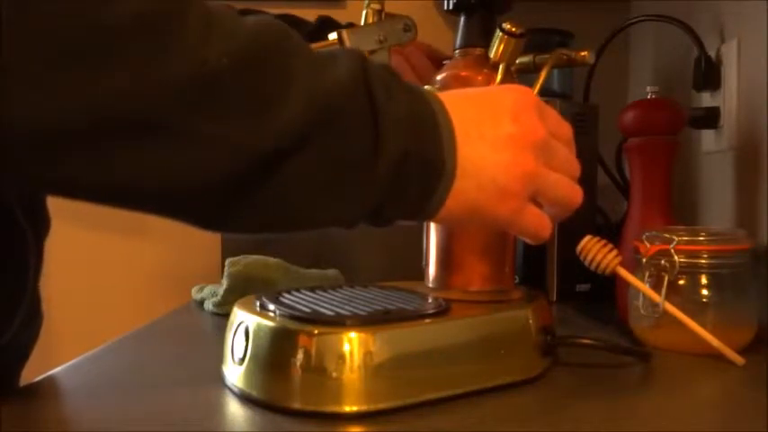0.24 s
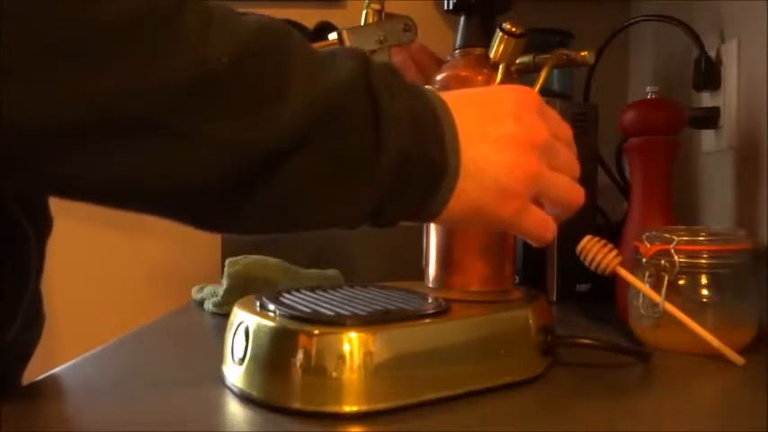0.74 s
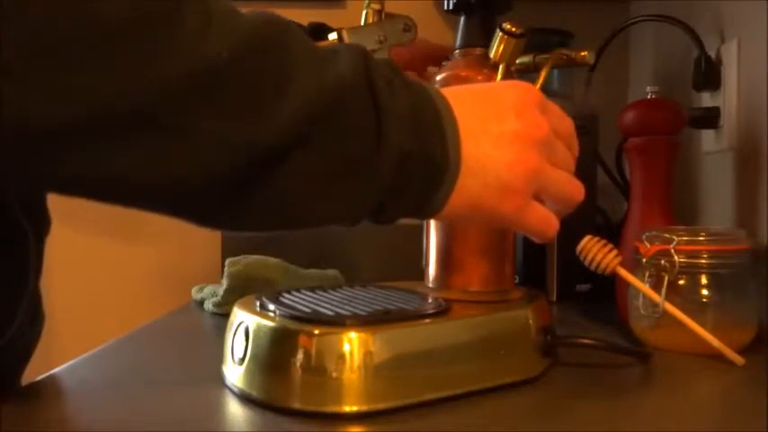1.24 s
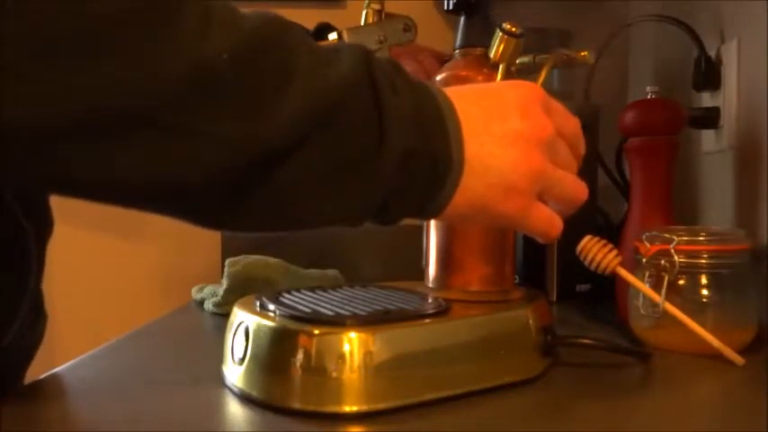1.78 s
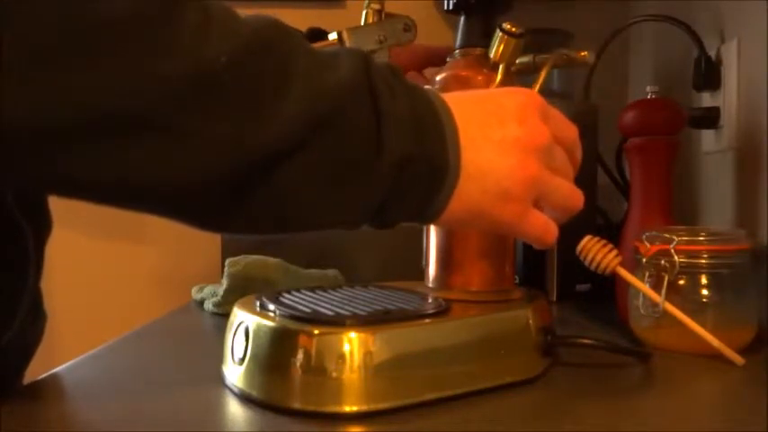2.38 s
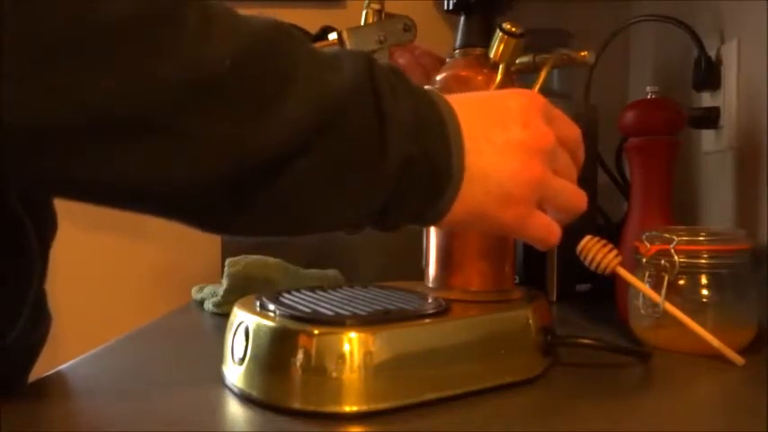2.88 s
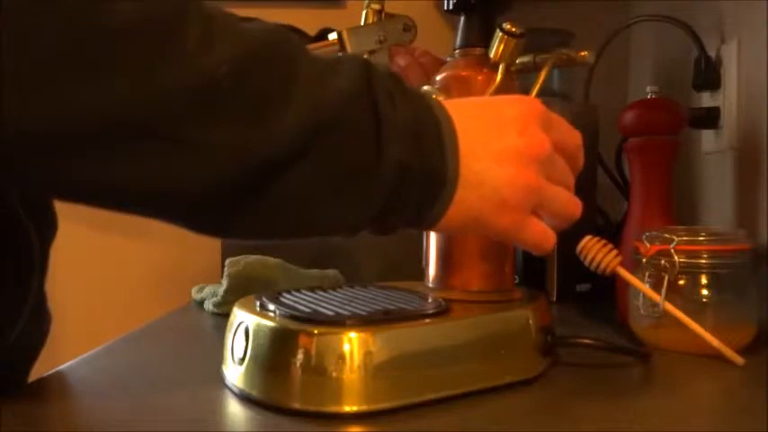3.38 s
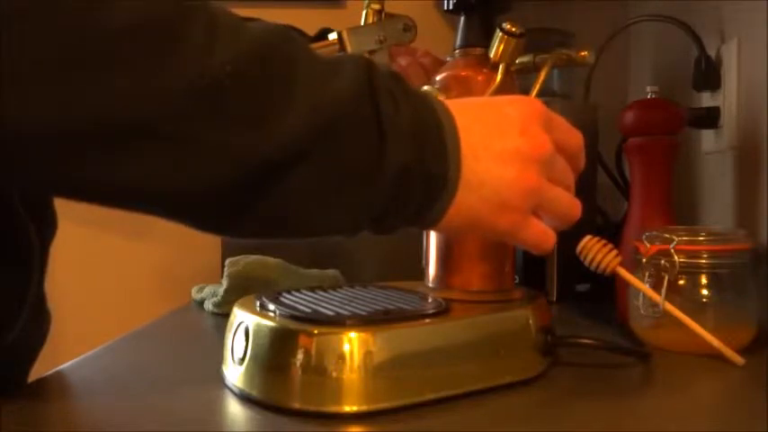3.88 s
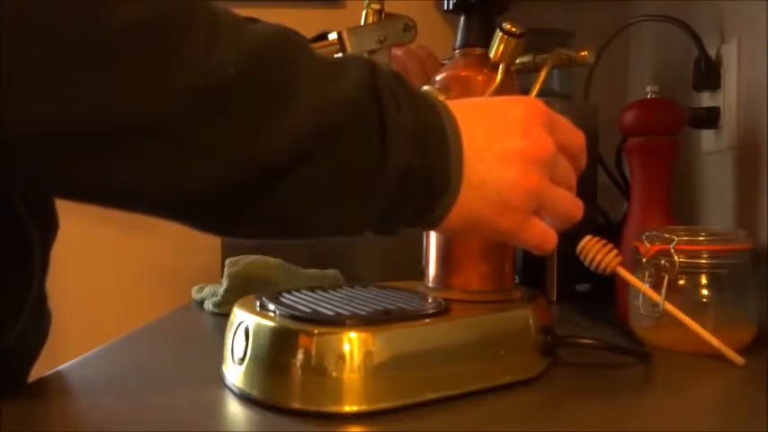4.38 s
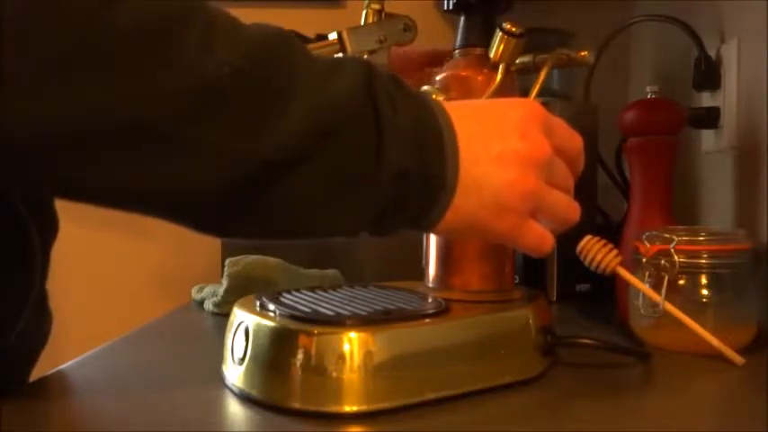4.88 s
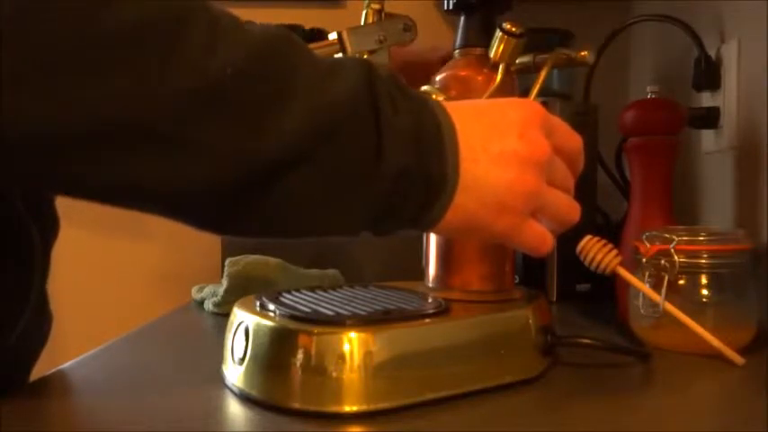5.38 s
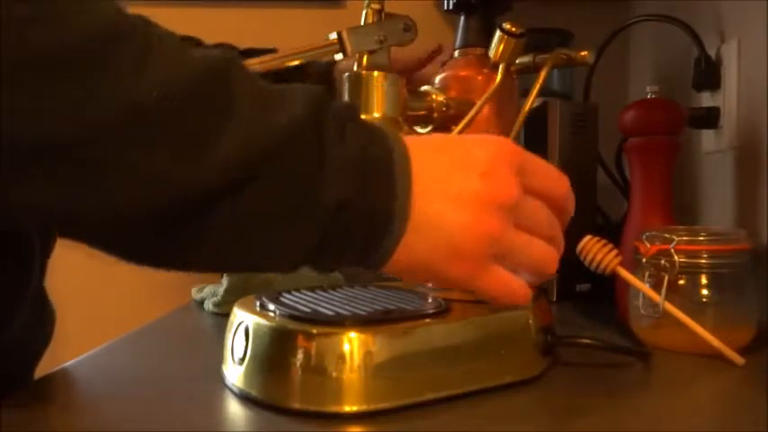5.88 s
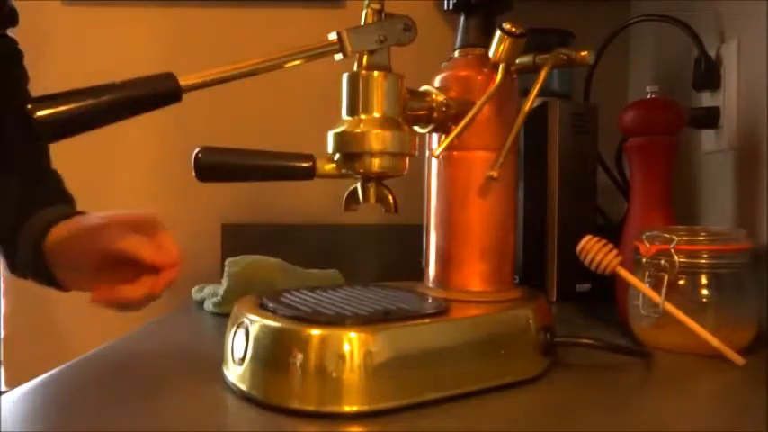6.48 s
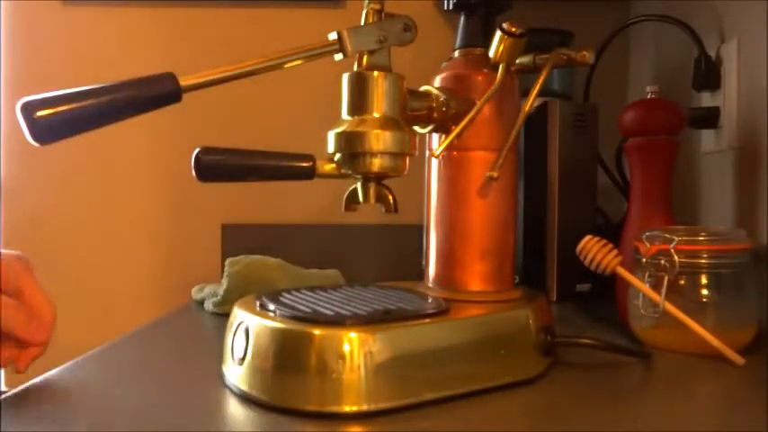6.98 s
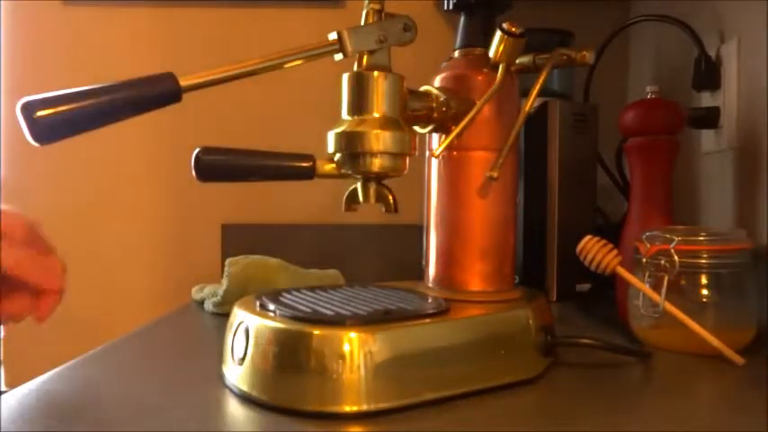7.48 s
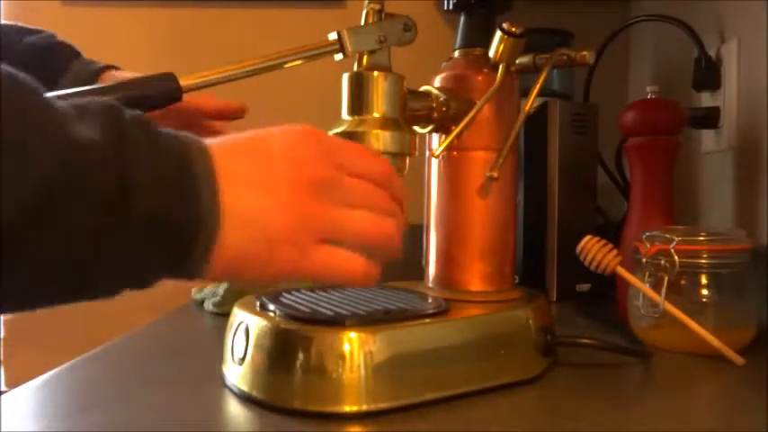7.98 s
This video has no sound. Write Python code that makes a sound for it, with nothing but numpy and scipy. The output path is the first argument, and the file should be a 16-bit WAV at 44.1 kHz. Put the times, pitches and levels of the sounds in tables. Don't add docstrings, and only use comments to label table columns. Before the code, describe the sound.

Steam blasts and sputters wetly from an espresso machine wand, dries to a steady loud hiss, shuts off abruptly, then faint hissing and soft handle knocks.

```python
import sys
import numpy as np
from scipy import signal
from scipy.fft import rfft, irfft, next_fast_len
from scipy.io import wavfile
from scipy.ndimage import uniform_filter1d, map_coordinates

SR = 44100
rng = np.random.default_rng(int(sys.argv[2]) if len(sys.argv) > 2 else 0)


def generate_wav(sig):
    pcm = np.round(np.clip(np.atleast_2d(sig).T, -1, 1) * 32767).astype(np.int16)
    wavfile.write(sys.argv[1], SR, pcm)


def gain_from_db(level_db):
    decades = np.asarray(level_db, float) / 20
    return 10 ** decades


N = 363825

# f/Hz, width/Hz, level/dB early, level/dB settled, level/dB with the
BOILER_MODES = [(2200, 236, -6, -7.5, -7.5), (2370, 89, -3.5, -4.5, -7), (2574, 150, -6.2, -6.5, -2.5),
                (2807, 213, -3.5, -2, -1), (3034, 320, -9, -9, -8.5), (3338, 153, -2.5, -2, -4.5),
                (3594, 116, -3.5, -3, -5), (3732, 154, -0.8, -0.6, -6), (4050, 200, -4, -7, -9),
                (4290, 50, -14, -14, -6), (4330, 110, -6, -6.5, -9), (4522, 118, -1, -3, 0),
                (4797, 227, -2.5, -4, -1), (5245, 170, -13, -7.5, -11.5), (5380, 75, -14, -16.9, -15),
                (5698, 220, -1.4, -5, -6.5), (5920, 300, -7.5, -16, -14), (6370, 210, -22, -12, -12),
                   (7020, 770, -35.0, -18.5, -17.5), (7230, 210, -11, -13, -14.5),
                   (7684, 608, -35.0, -19.9, -18.5), (8190, 467, -12, -15.4, -15.9),
                   (8536, 164, -2.5, -4.5, -4.5), (8880, 380, -6.5, -8.5, -7), (9280, 120, -13, -8, -10),
                   (9400, 670, -15.5, -10, -11.5), (9830, 270, -3, -17, -10.5),
                   (10100, 210, -36.0, -8, -6.5), (10410, 300, -8.5, -5.5, -4),
                   (10730, 460, -4.5, -11, -10)]
# f/Hz, width/Hz, level/dB
NOZZLE_MODES = [(2198, 92, -5), (2320, 880, -12), (2900, 200, -14.5), (3240, 45, -11.3), (3450, 200, -9.5),
                (3870, 690, -5.5), (4470, 550, -9), (4930, 51, -7), (4930, 91, -7.5), (5010, 840, -11),
                (5650, 330, -7.5), (6110, 500, -3.5), (6380, 201, -2.5), (6430, 104, -5), (6630, 309, -4),
                (6970, 280, -1.5), (7320, 340, -3), (7700, 331, -5.3), (8030, 500, -4), (8300, 143, -6),
                (8640, 240, -0.5), (8940, 220, 0.5), (9400, 290, -1.5), (9700, 93, -3), (9800, 190, 0),
                (10260, 458, -3.5), (10090, 145, 1.5), (10530, 180, -3.8), (10675, 127, 4.5),
                (10916, 260, -1.5)]
# f/Hz, width/Hz, level/dB
PIPE_MODES = [(733, 86, -11.5), (967, 205, -11.5), (1263, 140, -5), (1378, 20, -2), (1466, 370, -0.5),
              (1825, 430, -5.5)]
# f/Hz, width/Hz, depth/dB
CANCELLED_SLOTS = [(1406, 34, -9), (1770, 52, -4), (2007, 73, -9), (2440, 40, -8), (2704, 35, -4),
                   (2894, 46, -6.5), (3160, 40, -4), (3470, 50, -5), (4256, 40, -4), (4630, 45, -5),
                   (5300, 60, -2), (5490, 50, -6), (5100, 50, -5), (10150, 140, -3.5)]
# t/s, level/dB
VALVE_PRESSURE = [(0, -20), (.2, -18), (1.3, -18.6), (1.8, -22.2), (2.4, -24.5), (3.0, -28), (4.0, -28),
                  (4.8, -33), (5.08, -27), (6.2, -26), (8.25, -27)]
# t/s, stage (0 early, 1 settled, 2+ arm away)
BOILER_STAGE = [
    (0, 0),
    (1.4, 0.26),
    (2.8, 0.59),
    (5.9, 1.46),
    (6.4, 3),
    (8.25, 4),
]
# t/s, level/dB, length/s
WATER_SLUGS = [(0.14, -35, 0.025), (0.208, -30, 0.042), (0.282, -26.5, .04), (0.432, -29, .025),
               (0.55, -48, 0.012), (0.602, -40, .02), (0.672, -37, .015), (0.732, -32, .02),
               (0.794, -31, 0.024), (0.852, -29, 0.029), (0.885, -31, .02), (0.975, -33, 0.022),
               (1.06, -34, 0.038), (1.192, -29, 0.026), (1.364, -38, 0.025), (1.583, -21.5, 0.026)]
# t/s, peak level/dB, main ring f/Hz, t60/s
SOFT_KNOCKS = [(1.571, -43, 310, 0.1), (5.169, -51, 746, .08), (5.8, -55, 700, .08), (6.85, -48, 1080, .08),
               (6.98, -44, 844, 0.14), (6.985, -54, 230, .12), (7.55, -45, 860, 0.13),
               (7.578, -55, 895, .15), (7.598, -45, 885, .1), (7.652, -49, 907, .15),
               (7.678, -50, 915, .08), (8.049, -54, 900, .08), (8.239, -41, 1290, .05),
               (8.24, -36, 1850, 0.045), (8.241, -41, 900, .05), (8.243, -50, 250, .05)]
# frequency ratio, level/dB
KNOCK_PARTIALS = [(1, 0), (.87, -5), (1.22, -12), (.74, -11)]
# f/Hz, level/dB per Hz
ROOM_SPECTRUM = [(15, -85), (119, -15), (157, -16), (227, -8.5), (300, -14), (368, -7.5), (420, -13.5),
                 (520, -10), (610, -18), (690, -13.5), (1140, -17), (1650, -8.5), (2000, -12.5),
                 (3200, -120)]
# f/Hz, side minus mid level/dB
SIDE_OVER_MID = [(60, -23), (130, -18), (220, -8), (400, -4), (600, -10.5), (750, -4), (950, -9),
                 (1300, -6), (2010, -8), (3610, -9), (6480, -9.5), (11600, -13)]
# f/Hz, left minus right level/dB
LEFT_OVER_RIGHT = [(60, 0.0), (110, 2), (190, 0.65), (350, 0.093), (620, 0.78), (1120, -2), (2010, -1),
                   (3610, -2), (6480, -2), (11600, -1.4)]
# t/s, low f/Hz, high f/Hz
QUIET_BAND_GAPS = [(.1, 430, 680), (.48, 820, 900), (.6, 750, 900), (.795, 520, 845), (1.158, 200, 560),
                   (3.27, 20, 180), (2.63, 20, 676), (3.77, 20, 300), (4.6, 20, 300), (6.0, 780, 1340),
                   (6.49, 20, 150), (6.81, 1040, 1340)]

JET_DB, WET_JET_DB, PUFF_S, NOZZLE_CLEARS_S, NOZZLE_DRY_S = -22.5, -6, 0.26, 1.3, 1.74
ROAR_DB, ROAR_SAG_DB_PER_S, PIPE_CLEARS_S, PIPE_DRY_S = -32.5, -1.09, 0.54, 1.3
FIRST_WATER_DB, CHOKED_DB, CHOKES_S = -7.5, -12.5, 0.37
SHUT_S, JET_DIES_DB_PER_S2, ROAR_DIES_DB_PER_S, PIPE_EMPTIES_S = 4.96, -750, -170, 0.11
ROOM_DB, ROOM_DUCK_DB, RECOVERS_S = -50, -0.3, 0.2
HUM_HZ, HUM_DB, HUM_DUCK_DB, HUM_STARTS_DB, HUM_UP_S = 416.2, -54.5, -4, -10, 0.9
TOP_HZ = 11030


def steam():
    jet_db, roar_db = wand()
    jet_hiss = hiss([resonant(NOZZLE_MODES)], patchy_db=0.93, wide_db=-3.5)[0]
    jet = gain_from_db(jet_db + 0.31 * wobble(12)) * jet_hiss
    throat, gulp = hiss([resonant(PIPE_MODES), resonant(PIPE_MODES[2:5])], patchy_db=0.7, wide_db=-2.5)
    roar = gain_from_db(roar_db + 0.66 * wobble(24.8)) * throat
    return valve_leak() + jet + roar + water_slugs() * gulp


def valve_leak():
    valve_db, = curves(VALVE_PRESSURE)
    stage, = curves(BOILER_STAGE)
    stage = np.clip(stage, 0, 2)
    modes = np.array(BOILER_MODES)
    responses = [resonant(modes[:, [0, 1, column]]) for column in range(2, 5)]
    colours = hiss(responses, patchy_db=0.72, wide_db=-5.5)
    leak = sum(np.clip(1 - np.abs(stage - k), 0, 1) * colour for k, colour in enumerate(colours))
    return gain_from_db(valve_db + 0.4 * wobble(9)) * leak


def wand():
    t = np.arange(N) / SR
    since_shut = np.maximum(t - SHUT_S, 0)
    wet = ramp(0, PUFF_S) - ramp(NOZZLE_CLEARS_S, NOZZLE_DRY_S)
    jet_db = JET_DB + WET_JET_DB * wet + JET_DIES_DB_PER_S2 * since_shut ** 2
    choke_db = FIRST_WATER_DB + (CHOKED_DB - FIRST_WATER_DB) * ramp(CHOKES_S, PIPE_CLEARS_S)
    choke_db = choke_db - CHOKED_DB * ramp(PIPE_CLEARS_S, PIPE_DRY_S)
    roar_db = ROAR_DB + choke_db + ROAR_SAG_DB_PER_S * np.maximum(t - PIPE_DRY_S, 0)
    roar_db = roar_db + ROAR_DIES_DB_PER_S * np.maximum(since_shut - PIPE_EMPTIES_S, 0)
    return jet_db, roar_db


def water_slugs():
    slugs = np.zeros(N)
    for s, db, length in WATER_SLUGS:
        span, swell = bump(s, length)
        slugs[span] += gain_from_db(db - 4.5) * swell
    return slugs


def hiss(gains, patchy_db, wide_db):
    z = signal.stft(rng.standard_normal((2, N)), nperseg=512)[2]
    field = uniform_filter1d(rng.standard_normal(z.shape[1:]), size=8, axis=0)
    field = uniform_filter1d(field, size=8, axis=1)
    patchy = z * gain_from_db(patchy_db * unit(field))
    near, far = rfft(signal.istft(patchy, nperseg=512)[1][:, :N])
    hz = np.fft.rfftfreq(N, 1 / SR)
    direct = near * (1 + gain_from_db(-11) * reflections(t60=0.12))
    around = (near * reflections(t60=0.15) + far) * gain_from_db(along(SIDE_OVER_MID, hz) + wide_db)
    out = []
    for response in gains:
        gain = response(hz)
        smeared = np.sqrt(np.abs(uniform_filter1d(gain ** 2, size=3000)))
        mid, side = irfft(np.array([direct * gain, around * np.sqrt(gain * smeared)]), N)
        out.append(np.array([mid + side, mid - side]) / np.std(mid))
    return out


def resonant(modes):
    def response(hz):
        power = sum(gain_from_db(db) ** 2 / (1 + (2 * (hz - c) / w) ** 2) ** 2 for c, w, db in modes)
        slots_db = sum(db * np.exp(-(2 * (hz - c) / w) ** 2) for c, w, db in CANCELLED_SLOTS)
        return np.sqrt(power) * gain_from_db(slots_db)
    return response


def reflections(t60):
    t = np.arange(SR // 4) / SR
    tail = rng.standard_normal(len(t)) * gain_from_db(-60 * t / t60)
    return rfft(tail / np.linalg.norm(tail), N)


def knocks():
    out, t = np.zeros(N + SR), np.arange(SR // 4) / SR
    onset = 1 - np.exp(-t / 0.001)
    for s, db, hz, t60 in SOFT_KNOCKS:
        spread_db = rng.normal(0, 3.0, len(KNOCK_PARTIALS))
        ring = np.zeros(len(t))
        for (ratio, level), d in zip(KNOCK_PARTIALS, spread_db):
            ring += gain_from_db(level + d) * np.sin(2 * np.pi * hz * ratio * t)
        noise = uniform_filter1d(rng.standard_normal(len(t)), size=8)
        puff = 1.5 * noise * gain_from_db(-60 * t / 0.033)
        out[round(s * SR):][:len(t)] += gain_from_db(db + 1.5) * (ring * gain_from_db(-60 * t / t60) + puff) * onset
    return out[:N]


def kitchen():
    ducked = 1 - ramp(SHUT_S - RECOVERS_S, SHUT_S + RECOVERS_S / 2)
    floor_db = ROOM_DB + ROOM_DUCK_DB * ducked
    hum_db = HUM_DB + HUM_DUCK_DB * ducked + HUM_STARTS_DB * (1 - ramp(0, HUM_UP_S))
    room = hiss([lambda hz: gain_from_db(along(ROOM_SPECTRUM, hz))], patchy_db=2.1, wide_db=0)[0]
    bass = filtered(room, lambda hz: 1 / (1 + (hz / 210) ** 4))
    lumps = gain_from_db(3.5 * np.minimum(wobble(6), 1) - 1)
    rumble = gain_from_db(floor_db + 0.6 * wobble(6.5)) * (room + (lumps - 1) * bass)
    hum = np.sqrt(2) * gain_from_db(hum_db) * np.sin(2 * np.pi * HUM_HZ * np.arange(N) / SR)
    return rumble + hum * gain_from_db([[1.8], [-1.8]])


def unit(x):
    return x / np.sqrt(np.mean(x ** 2) + 1e-20)


def along(points, hz):
    f, v = np.transpose(points)
    return np.interp(np.log(hz + 1), np.log(f + 1), v)


def curves(rows):
    s, *cols = np.transpose(rows)
    return [np.interp(np.arange(N) / SR, s, c) for c in cols]


def wobble(rate):
    knots = rng.standard_normal(int(N * rate / SR) + 4)
    return map_coordinates(knots, [np.arange(N) * rate / SR])


def ramp(start, end):
    return np.clip((np.arange(N) / SR - start) / max(end - start, 1e-3), 0, 1)


def bump(s, length):
    span = slice(max(round((s - 0.1) * SR), 0), round((s + 0.1) * SR))
    return span, np.exp(-(2 * (np.arange(N)[span] / SR - s) / length) ** 2)


def filtered(x, response):
    m = next_fast_len(N + 8192)
    return irfft(rfft(x, m) * response(np.fft.rfftfreq(m, 1 / SR)), m)[..., :N]


def scene():
    return steam() + knocks() + kitchen()


def gapped(pair):
    out = pair.copy()
    for s, low_hz, high_hz in QUIET_BAND_GAPS:
        span, swell = bump(s, length=0.045)
        band = signal.butter(2, [low_hz, high_hz], 'bandpass', fs=SR, output='sos')
        quiet = signal.sosfiltfilt(band, out[:, span])
        out[:, span] -= np.minimum(1.1 * swell, 0.95) * quiet
    return out


def narrowed(pair, under_db, scatter_db):
    mid, side = (pair[0] + pair[1]) / 2, (pair[0] - pair[1]) / 2
    z = signal.stft(np.array([mid, side]), window='cosine', nperseg=2048)[2]
    z_mid, z_side = z[:, :1024]
    bands = np.mean(np.abs(z_side.reshape(256, 4, -1)) ** 2, axis=1)
    loudness = np.mean(np.abs(z_mid[:512]) ** 2, axis=0)
    limit = loudness * gain_from_db(under_db + scatter_db * rng.standard_normal(bands.shape)) ** 2
    kept = np.repeat(bands > limit, repeats=4, axis=0) * z_side
    kept = np.pad(kept, ((0, 1), (0, 0)))
    side = signal.istft(kept, window='cosine', nperseg=2048)[1][:N]
    return np.array([mid + side, mid - side])


def top_cut(x):
    return signal.sosfilt(signal.butter(12, 12240, fs=SR, output="sos"), x)


def record(dry):
    def ports(hz):
        band = (hz < TOP_HZ) / np.sqrt(1 + (55 / (hz + 1)) ** 6)
        return band * gain_from_db(along(LEFT_OVER_RIGHT, hz) * np.array([[0.5], [-0.5]]))
    mix = gapped(filtered(dry, ports))
    mix = narrowed(mix, under_db=-22, scatter_db=3)
    return top_cut(mix)


dry = scene()
out = record(dry)
generate_wav(out)
```